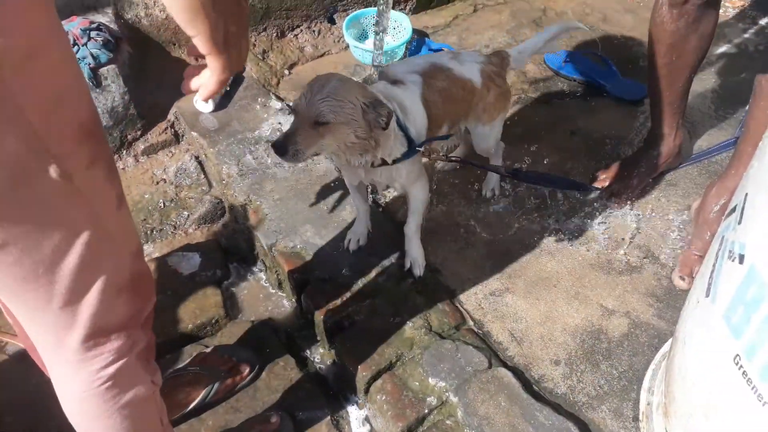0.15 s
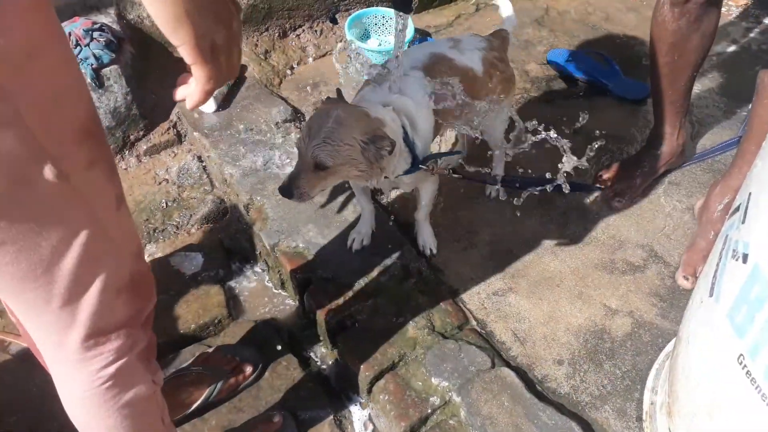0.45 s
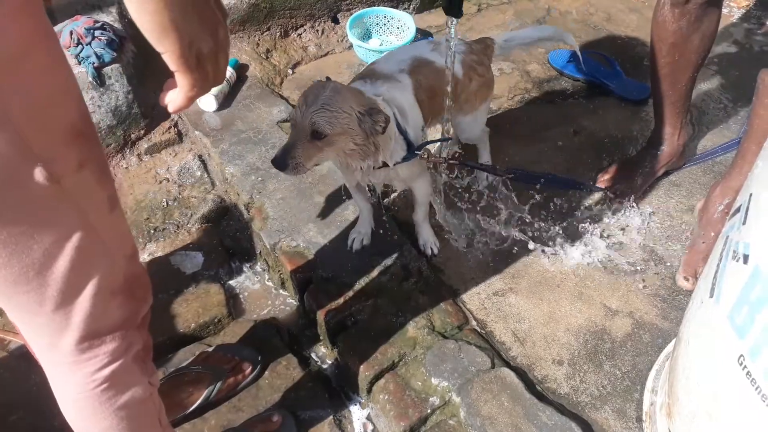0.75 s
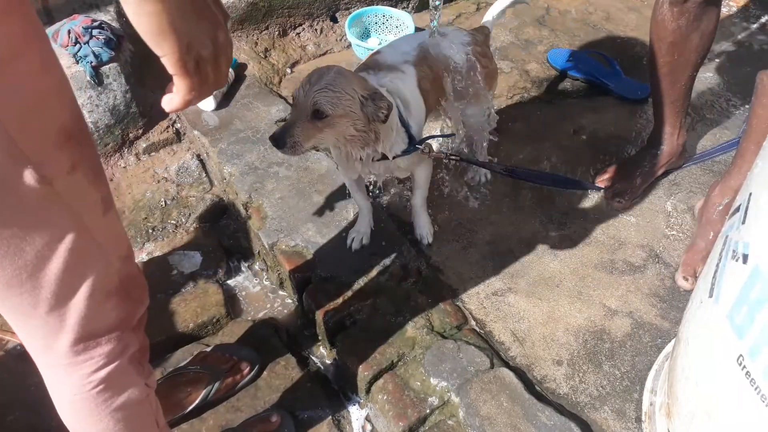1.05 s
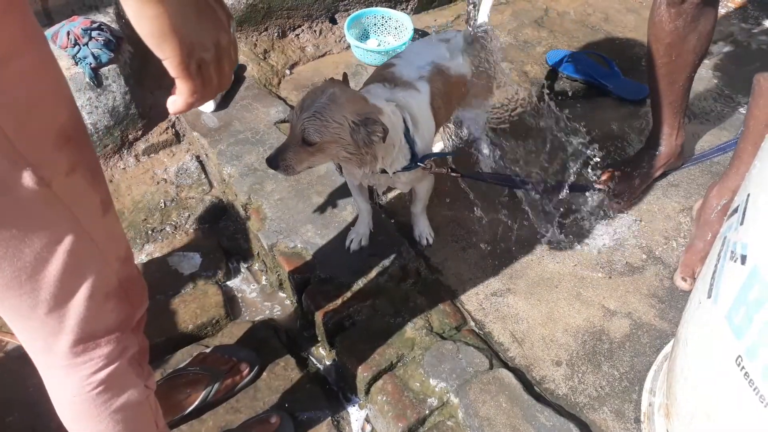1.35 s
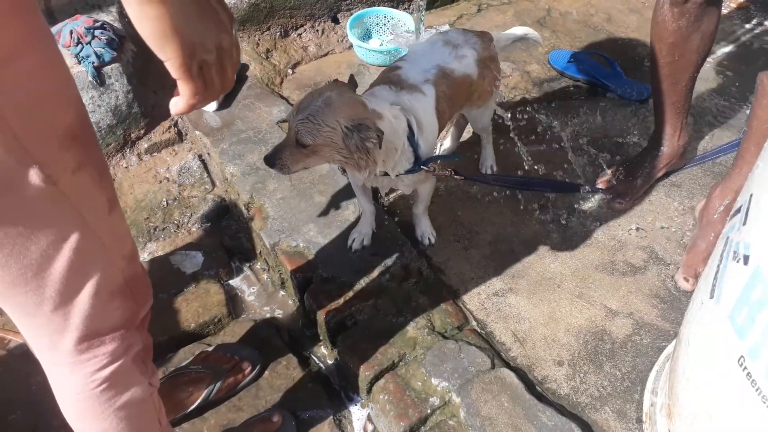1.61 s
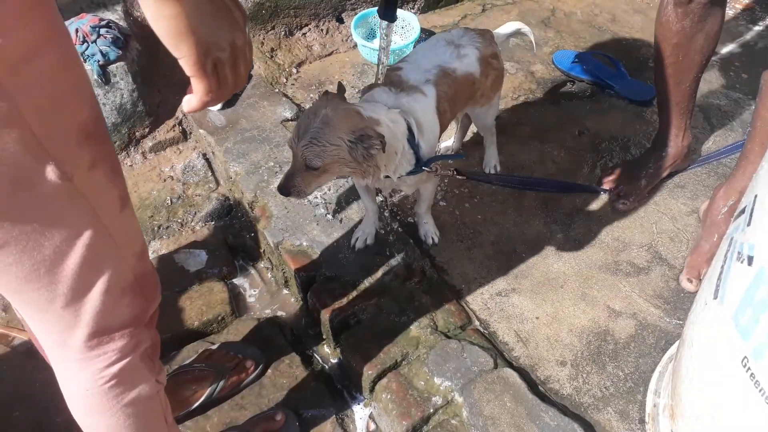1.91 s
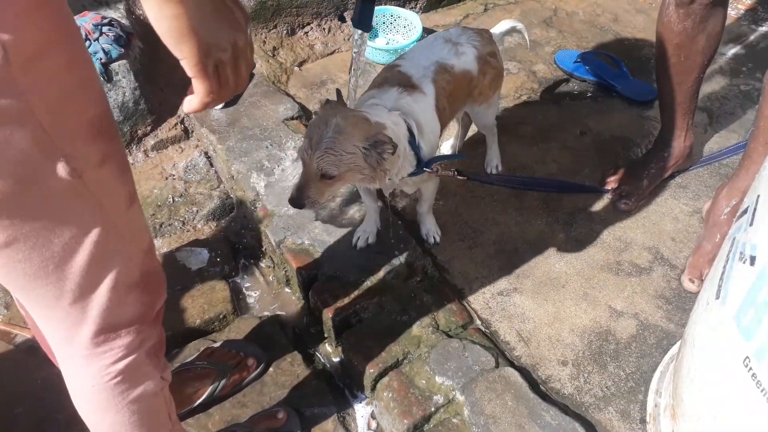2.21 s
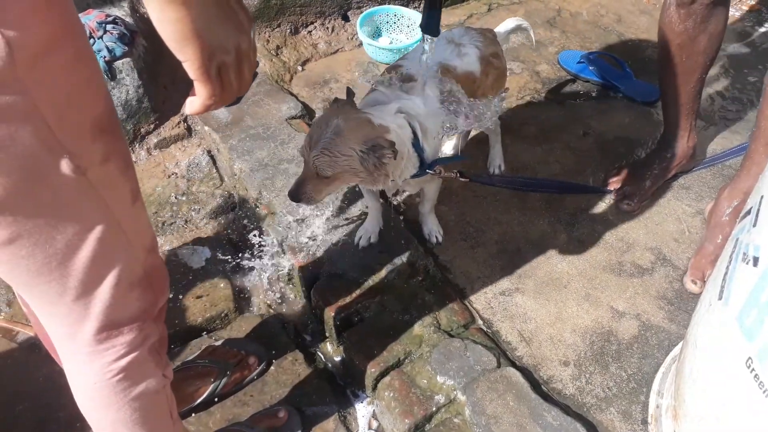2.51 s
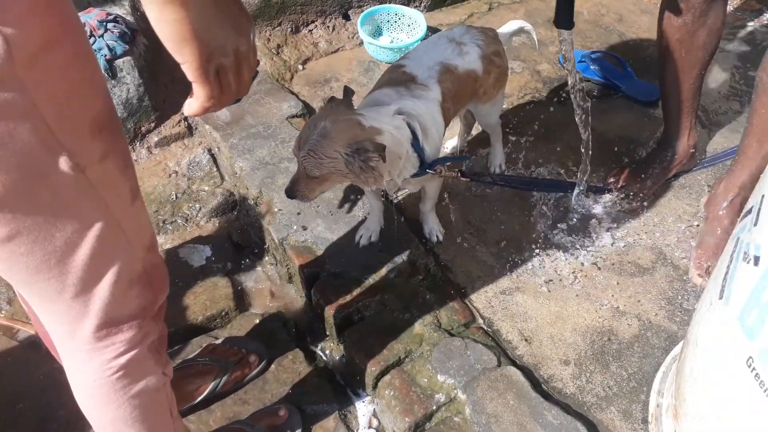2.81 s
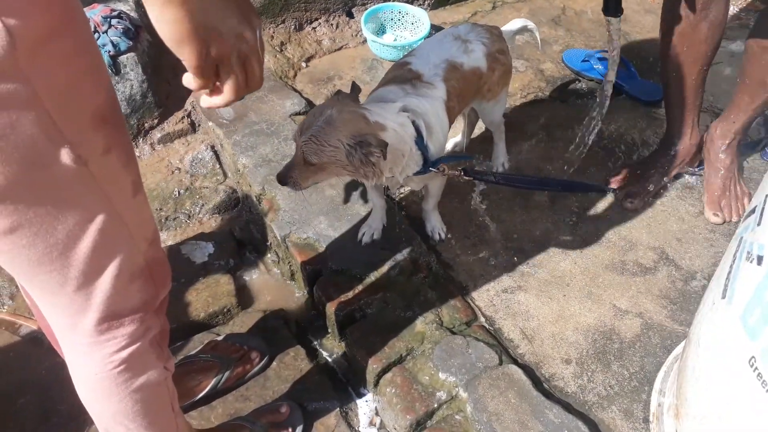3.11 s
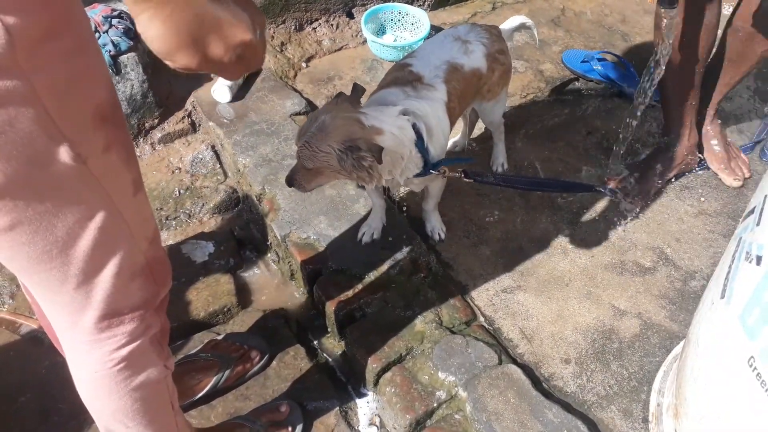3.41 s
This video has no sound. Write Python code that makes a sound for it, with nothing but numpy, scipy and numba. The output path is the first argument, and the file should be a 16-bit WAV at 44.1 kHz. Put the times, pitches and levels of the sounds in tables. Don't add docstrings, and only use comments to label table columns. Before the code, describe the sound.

Hose water spatters on a wet dog and stone paving, bright and crackly, from start to end. Until about 1.7 s it is dense with quick slaps, sharp drop clicks and bubbly pops, then more broken, with a hard crack near 2.4 s and a brief sheet of splashing around 2.8 s. It thins into softer trickling and plinks by 3.5 s. Close, dry outdoor sound over a very faint hum.

```python
import sys
import numpy as np
from scipy import signal
from scipy.fft import rfft, irfft
from scipy.io import wavfile
from scipy.ndimage import uniform_filter1d
from numba import njit

SR = 44100
rng = np.random.default_rng(int(sys.argv[2]) if len(sys.argv) > 2 else 0)


def unload_wav(signal):
    wavfile.write(
        sys.argv[1],
        SR,
        np.round(np.clip(np.atleast_2d(signal).T, -1, 1) * 32767).astype(np.int16),
    )


def volts_from_decibels(level):
    exponent = np.asarray(level, float) / 20
    return 10 ** exponent


N = 156555

# (frequency [Hz], density [dB per Hz])
YARD_SPECTRUM = [(20, -17), (45, -24), (70, -13), (85, 0), (200, -2), (300, -6.5), (1000, -6),
                 (3000, -21.5)]
# (time [s], peak [dB], pitch [Hz])
LOW_BUBBLES = [(0.173, -34, 1940), (0.361, -29, 2540), (0.532, -18.5, 2360), (0.74, -21, 1890),
               (0.814, -23, 1553), (0.835, -30, 1920), (1.024, -32, 1300), (1.051, -28.5, 1550),
               (1.076, -28, 2160), (1.13, -29.5, 1780), (2.008, -39, 1650), (2.205, -47, 943),
               (2.697, -31.5, 1490), (3.072, -30.5, 2320), (3.088, -29, 1270), (3.233, -30.5, 1906),
               (3.29, -23.5, 2360)]
# (time [s], peak [dB], pitch [Hz])
MID_BUBBLES = [(0.0198, -16, 3680), (0.1165, -16, 4290), (0.2234, -10, 3820), (0.3949, -10.5, 5040),
               (0.5781, -11.5, 4470), (1.0316, -19.5, 4050), (1.0786, -14, 4050), (1.117, -12, 3770),
               (1.1502, -13, 4300), (1.2266, -13, 4070), (1.3347, -14, 4010), (1.4037, -15.5, 2970),
               (1.4224, -17.5, 3900), (1.5244, -18, 2800), (1.5853, -13.5, 3280), (2.1695, -23.5, 4150),
               (2.283, -13.5, 4940), (2.6501, -18.5, 4240), (2.815, -12, 3400)]
# (time [s], peak [dB], pitch [Hz])
THUDS = [(.054, -46.5, 635), (.212, -51, 397), (.46, -41.5, 1220), (.795, -60, 239), (.80, -46.5, 615),
         (1.075, -44.5, 680), (1.81, -42, 595), (1.812, -51, 223), (2.337, -46, 610), (2.762, -47.5, 505),
         (3.345, -36, 1150), (3.358, -46.5, 202), (1.49, -62, 203), (3.02, -57, 110.4), (1.59, -42, 960),
         (3.23, -62, 96), (3.35, -47, 445), (3.35, -46, 657)]
# (time [s], peak [dB], pitch [Hz])
PLINKS = [(.028, -36, 2000), (.065, -35, 2680), (.123, -23, 3830), (.132, -34, 2200), (.211, -30, 1540),
          (.22, -20.5, 2340), (.256, -23, 2340), (.275, -32.5, 1800), (.345, -18, 4600), (.45, -31, 2450),
          (.564, -20.5, 4130), (.67, -30.5, 1840), (.803, -21, 2610), (.933, -31, 3500),
          (.952, -29.5, 4000), (1.097, -18.5, 3800), (1.282, -22, 3600), (1.322, -19, 3690),
          (1.403, -36.5, 1890), (1.42, -20, 2970), (1.477, -24, 3370), (1.548, -30, 3920),
          (1.667, -19, 4090), (1.815, -21, 3860), (1.918, -40, 1800), (1.943, -27.5, 2490),
          (2.098, -24, 3600), (2.245, -31, 4200), (2.452, -25.5, 3300), (2.532, -18.5, 4180),
          (2.707, -29, 3190), (2.761, -17.5, 2650), (2.763, -21, 3630), (2.786, -23, 2480),
          (2.854, -16, 4260), (3.009, -22, 2670), (3.048, -31, 2520), (3.086, -38, 4300),
          (3.113, -29.5, 6700), (3.249, -23.5, 4390), (3.403, -30, 2300), (3.51, -39, 1320)]
# (time [s], peak [dB], pitch [Hz])
SINKING = [
    (2.862, -29, 1930),
]
# (time [s], level [dB], drop size [dB per octave toward the bass])
FLOW = [(0.0, -30.5, 2.2), (0.1, -35.5, -4.5), (0.3, -30.5, 0.2), (0.5, -28.5, 2), (0.7, -29.5, -2.9),
        (0.9, -28, 0.2), (1.2, -31, -4), (1.45, -23, -2.5), (1.7, -32.5, -2), (1.8, -42, -0.5),
        (1.9, -29.5, 0.5), (2.23, -38, -5), (2.454, -20.5, 1.2), (2.62, -32.5, -2.1), (2.735, -46, -3.2),
        (2.9, -27, 0.3), (3.2, -38.5, -0.7), (3.55, -33, -0.8)]
# (time [s], level [dB], die-away [s])
SLAPS_EARLY = [(0.0185, -22.5, 0.0062), (0.085, -18.5, 0.0016), (0.115, -26.5, 0.031),
               (0.1446, -22.5, 0.015), (0.1782, -20.5, 0.005), (0.2037, -18.5, 0.039), (0.249, -21.5, 0.02),
               (0.3437, -19, 0.0018), (0.56, -24, 0.023), (0.6064, -23.5, 0.03), (0.6578, -18.5, 0.016),
               (0.696, -22, 0.051), (0.7135, -26, 0.0066), (0.735, -14, 0.01), (0.759, -17.5, 0.006),
               (0.7787, -14, 0.046), (0.949, -23, 0.0035), (1.024, -29, 0.0061), (1.075, -21.5, 0.016),
               (1.113, -25.5, 0.056), (1.248, -25, 0.0096), (1.281, -17, 0.003), (1.3136, -23, 0.024),
               (1.429, -19, 0.019), (1.5475, -18.5, 0.0076), (1.5848, -19.5, 0.018), (1.6299, -19, 0.0046),
               (1.6416, -20.5, 0.012), (1.665, -24, 0.025)]
# (time [s], level [dB], die-away [s])
SLAPS_LATE = [(1.727, -23.5, 0.0036), (1.7402, -27.5, 0.01), (1.8045, -26, 0.038), (1.811, -20.5, 0.035),
              (1.857, -23, 0.019), (1.941, -23, 0.0093), (1.9788, -20, 0.0057), (2.009, -24, 0.011),
              (2.0774, -22, 0.0038), (2.095, -26.5, 0.028), (2.1704, -24.5, 0.0045), (2.1918, -25, 0.0032),
              (2.2734, -29.5, 0.12), (2.3794, -16.5, 0.0041), (2.508, -21, 0.0091), (2.533, -23, 0.0042),
              (2.646, -31.5, 0.028), (2.672, -29, 0.033), (2.7476, -33, 0.02), (2.8399, -21.5, 0.016),
              (2.8927, -17, 0.0033), (3.005, -22, 0.014), (3.108, -32, 0.016), (3.1679, -36, 0.04),
              (3.2422, -27, 0.36), (3.363, -25.5, 0.035), (3.393, -25.5, 0.045)]
# (time [s], level [dB], length [s])
SHEET = (2.7595, -19, 0.1)
# (time [s], peak [dB])
TICKS = [(0.0195, -16), (0.0862, -13), (0.1166, -14), (0.1487, -2), (0.2044, -18), (0.345, -10),
         (0.396, -23), (0.422, -13), (0.4625, -7.5), (0.5495, -21), (0.5637, -10.5), (0.6095, -15),
         (0.618, -11), (0.664, -15), (0.715, -12), (0.7396, -5), (0.7807, -3), (1.0301, -19), (1.076, -19),
         (1.1628, -5.5), (1.2501, -9), (1.2815, -13), (1.317, -6.5), (1.378, -8), (1.3964, -1.5),
         (1.4205, -4), (1.507, -29), (1.532, -12), (1.5499, -23), (1.586, -14), (1.6307, -23), (1.6437, -9),
         (1.674, -13), (1.744, -9), (1.8147, -13), (1.943, -12), (1.981, -4), (2.0972, -7), (2.173, -18),
         (2.2558, -17), (2.276, -9.5), (2.3865, 1), (2.4438, -21), (2.7556, -14), (2.7606, -6),
         (2.893, -11), (2.9886, -19), (3.007, -9.5), (3.2446, -13), (3.3704, -11), (3.3958, -10),
         (3.421, -9)]
# (frequency [Hz], density [dB per Hz])
SPRAY_SPECTRUM = [(150, -61), (500, -27), (1000, -22), (2000, -10.5), (3500, -6), (7000, -3.5),
                  (11000, -10.5), (16000, -19)]
# (frequency [Hz], width [Hz], gain [dB])
PORT = [(4150, 1510, 4.5), (5374, 1270, -5), (6765, 1910, 9.5), (9540, 810, -7), (12200, 3500, 4.5)]


def on_log(points, hz):
    p = np.array(points, float)
    return np.interp(np.log(np.maximum(hz, 1)), np.log(p[:, 0]), p[:, 1])


def unit(x):
    return x / np.sqrt(np.mean(x ** 2))


def colour(x, db_at):
    cepstrum = irfft(db_at(np.fft.rfftfreq(2048, 1 / SR)) * np.log(10) / 20)
    cepstrum[1:1024] *= 2
    cepstrum[1025:] = 0
    response = irfft(np.exp(rfft(cepstrum)))
    return signal.fftconvolve(x, response)[:N]


def highpass(x, hz):
    return signal.sosfilt(signal.butter(2, hz, "high", fs=SR, output="sos"), x)


def walk(rate):
    hold = int(SR / rate)
    steps = np.repeat(rng.standard_normal(N // 20), hold)[:N]
    return unit(uniform_filter1d(steps, hold))


def yard():
    hum = unit(colour(rng.standard_normal(N), lambda hz: on_log(YARD_SPECTRUM, hz)))
    flutter_db = 0.16 * walk(5.8)
    swell_db = 3 * np.arange(N) / N
    return volts_from_decibels(-62 + flutter_db + swell_db) * hum


@njit
def grains(start, hz, cycles, size, glide, swell, total):
    y = np.zeros(total)
    for g in range(len(start)):
        w = 2 * np.pi * hz[g] / SR
        fade = hz[g] / SR / cycles[g] * 3
        phase = 0.
        for i in range(min(int(6 / fade), total - start[g])):
            phase += max(min(w * (1 + glide * fade * i / 3), 2.8), .01)
            opening = 1 - np.exp(-w * i / swell)
            y[start[g] + i] += size[g] * np.exp(-fade * i) * opening * np.sin(phase)
    return y


def bubbles(rows, cycles, db, glide=0.05):
    r = np.tile(np.array(rows, float), (3, 1))
    delay, detune = rng.random((len(r), 2)).T
    fragment = np.arange(len(r)) >= len(rows)
    at = r[:, 0] + fragment * delay * 14 / r[:, 2]
    hz = r[:, 2] * (1 + fragment * 0.5 * (detune - .4))
    size = volts_from_decibels(r[:, 1] + db - 6.2 * fragment)
    return grains((at * SR).astype(np.int64), hz, cycles + 0 * hz, size, 1. * glide, 5.9, N)


def patter(rate, die_s):
    bed = 0.5
    kicks = (rng.random(N) < rate / SR) * np.minimum(rng.exponential(size=N), 3)
    power = signal.lfilter([1], [1, -np.exp(-1 / (die_s * SR))], kicks)
    return np.sqrt(bed + (1 - bed) * power / power.mean())


def landing():
    rise_s, slap_db, slap_shape = .0012, -0.22, 2.01
    tick_db, tick_s = -12, 0.002
    t, flow = np.arange(N) / SR, np.array(FLOW)
    drops = patter(190, 0.002)
    power = (volts_from_decibels(np.interp(t, flow[:, 0], flow[:, 1])) * drops) ** 2

    hits = [tuple(r) for r in SLAPS_EARLY] + [tuple(r) for r in SLAPS_LATE]
    hits += [(s, db + tick_db, tick_s) for s, db in TICKS]
    for s, db, die_s in hits:
        a = int(s * SR)
        u = t[a:a + SR // 2] - t[a]
        shape = (1 - np.exp(-u / rise_s)) * np.exp(-(u / max(die_s, .001)) ** slap_shape)
        power[a:a + len(u)] += volts_from_decibels(2 * (db + slap_db)) * shape * np.sqrt(drops[a:a + len(u)])

    sheet_s, sheet_db, sheet_length = SHEET
    since = (t - sheet_s) / sheet_length
    power += volts_from_decibels(2 * sheet_db) * (since > 0) * np.exp(-np.abs(since) ** 8) * drops
    return np.sqrt(power), np.interp(t, flow[:, 0], flow[:, 2])


def droplets(size, count, cycles, spread_db, lo_hz, hi_hz):
    when, pitch, ring, strength = rng.random((count, 4)).T
    at = (when * N).astype(np.int64)
    hz = lo_hz * (hi_hz / lo_hz) ** pitch
    turns = cycles * (.5 + ring)
    flurry = np.array([walk(50) for _ in range(5)])[(pitch * 5).astype(int), at]
    db = on_log(SPRAY_SPECTRUM, hz) - spread_db * np.log(strength + 0.026)
    db = db - size[at] * np.log2(hz / 5000) + 2 * flurry
    return at, hz, turns, volts_from_decibels(db) * hz / np.sqrt(turns)


def shower(gain, db, drops):
    at, hz, turns, a = drops
    even = np.std(grains(at, hz, turns, a, 0.15, 2.82, N))
    return volts_from_decibels(db) * grains(at, hz, turns, a * gain[at], 0.09, 3.05, N) / even


def stone_tone(x):
    return colour(x, lambda hz: on_log(SPRAY_SPECTRUM, hz))


def hard_drops():
    crack_db, crack_s = -1, .0007
    cracks, r = np.zeros(N), np.array(TICKS)
    click_peak = np.max(np.abs(stone_tone(np.eye(1, N)[0])))
    cracks[(r[:, 0] * SR).astype(int)] = volts_from_decibels(r[:, 1] + crack_db) / click_peak
    decay = signal.lfilter([1], [1, -np.exp(-1 / (crack_s * SR))], cracks)
    burst = rng.standard_normal(N) * decay / 3
    return highpass(stone_tone(cracks + burst), 3900)


def spray():
    gain, size = landing()
    size = size + 0.014 * (20 * np.log10(gain) + 28)
    mist = volts_from_decibels(-14) * gain * unit(stone_tone(rng.standard_normal(N)))

    strength = volts_from_decibels(np.minimum(rng.exponential(size=N), 4)) * rng.choice([-1, 1], N)
    clicks = np.where(rng.random(N) < 400 / SR, strength, 0)
    clicks = volts_from_decibels(-16) * gain * unit(stone_tone(clicks))

    crackle = droplets(size, count=40000, cycles=0.85, spread_db=4.5, lo_hz=1620, hi_hz=18800)
    fizz = droplets(size, count=14000, cycles=7, spread_db=3.0, lo_hz=2498, hi_hz=17300)
    plinks = droplets(size, count=2200, cycles=14.4, spread_db=2.5, lo_hz=452, hi_hz=5460)
    fine = mist + clicks + shower(gain, -5.5, crackle)
    fine = highpass(highpass(fine, 2150), 2150)
    return fine + shower(gain, -4, fizz) + shower(gain, -9, plinks) + hard_drops()


def surroundings():
    echo_s, echo_db, tail_s, tail_db = 0.0032, -19, .045, -16
    u = np.arange(SR // 5) / SR
    space = rng.standard_normal(len(u)) * volts_from_decibels(-60 * u / tail_s) * (u > echo_s)
    space *= volts_from_decibels(tail_db) / np.sqrt(np.sum(space ** 2))
    space[0] = 1
    space[int(echo_s * SR)] += volts_from_decibels(echo_db)
    return space


def scene():
    water = spray()
    water = water + bubbles(LOW_BUBBLES, cycles=12, db=5)
    water = water + bubbles(MID_BUBBLES, cycles=10.3, db=7)
    water = water + bubbles(THUDS, cycles=4.1, db=15.3)
    water = water + bubbles(PLINKS, cycles=19, db=5)
    water = water + bubbles(SINKING, cycles=55, db=2.4, glide=-.35)
    wet = signal.fftconvolve(water, surroundings())[:N]
    return (wet * volts_from_decibels(-3.0) + yard())[None]


def roll_off(x):
    return signal.sosfilt(signal.butter(12, 16680, fs=SR, output="sos"), x)


def record(dry):
    x = colour(dry[0], lambda f: sum(db / (1 + (2 * (f - hz) / w) ** 2) for hz, w, db in PORT))
    x = highpass(np.tanh(1.084 * x) / 1.128, 55)
    x = signal.sosfilt(signal.ellip(8, .2, 45, 15800, fs=SR, output="sos"), x)
    mix = x[None] - .0006
    return roll_off(mix)


dry = scene()
out = record(dry)
unload_wav(out)
```